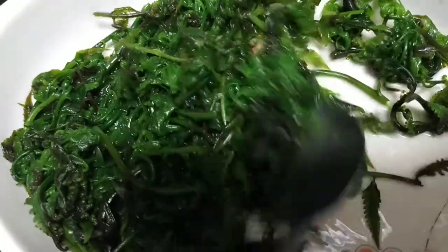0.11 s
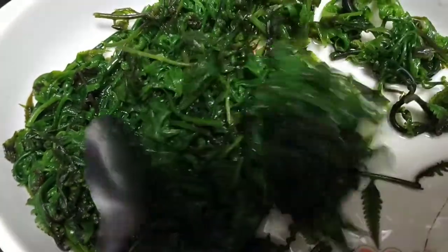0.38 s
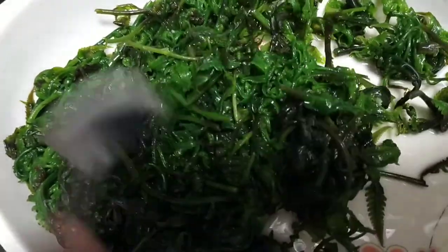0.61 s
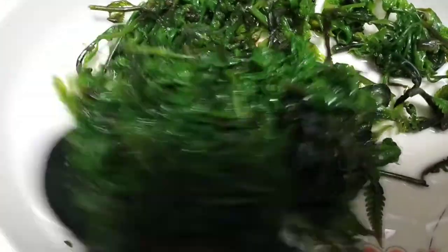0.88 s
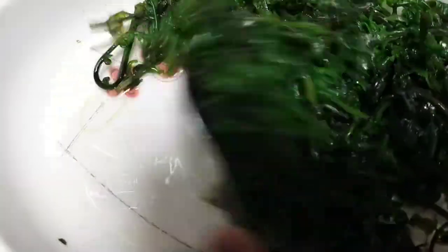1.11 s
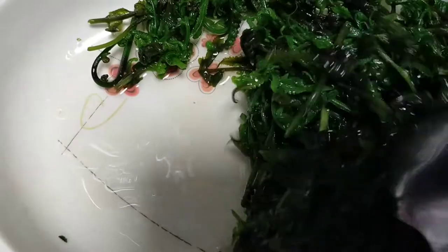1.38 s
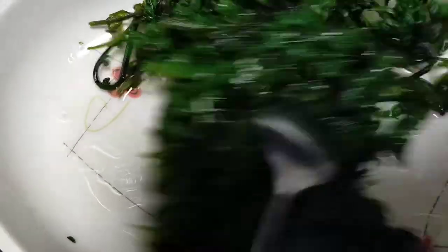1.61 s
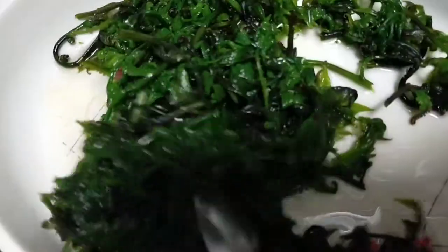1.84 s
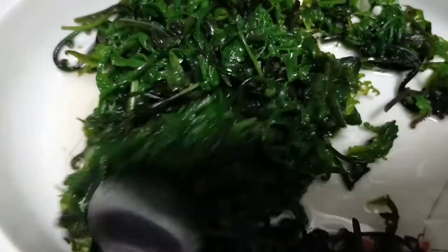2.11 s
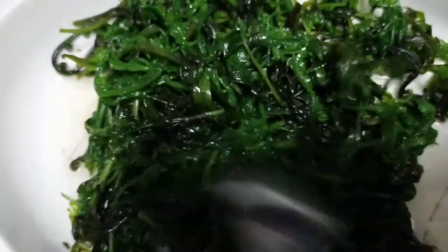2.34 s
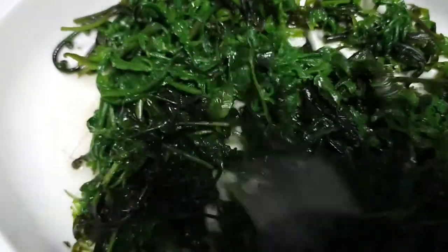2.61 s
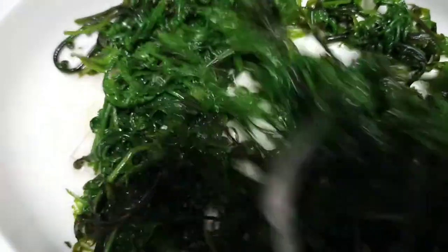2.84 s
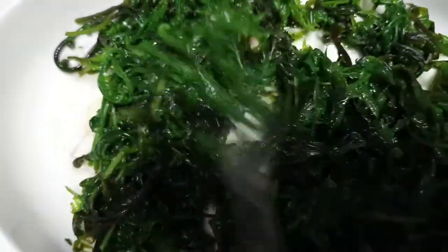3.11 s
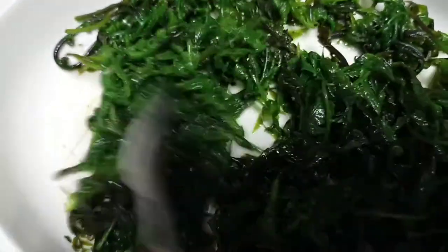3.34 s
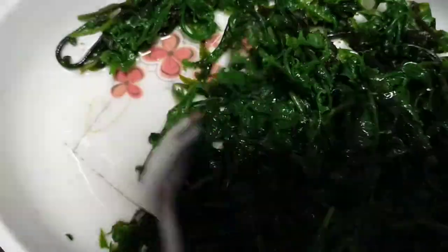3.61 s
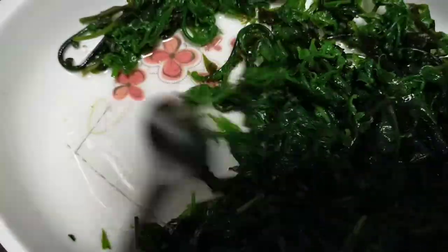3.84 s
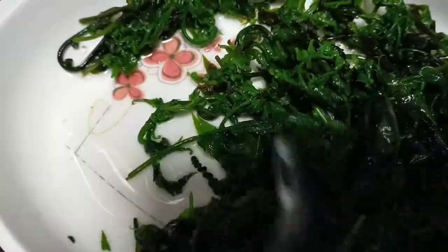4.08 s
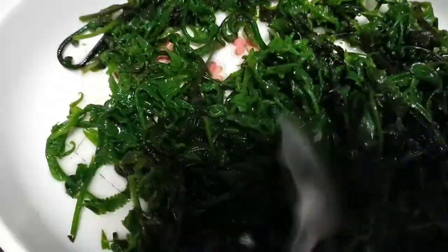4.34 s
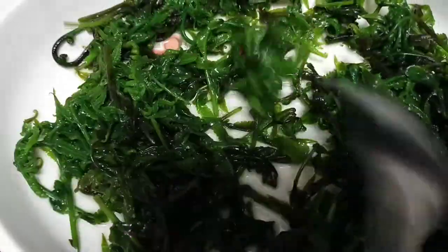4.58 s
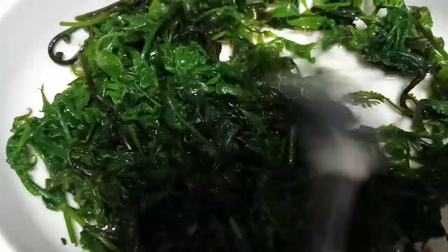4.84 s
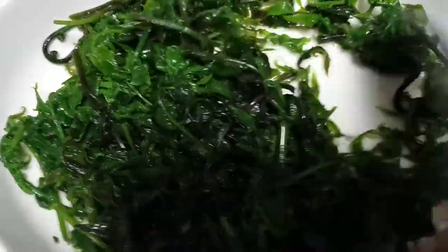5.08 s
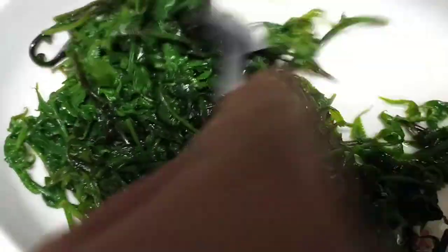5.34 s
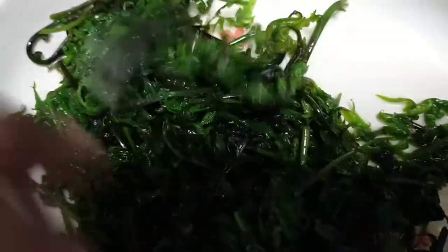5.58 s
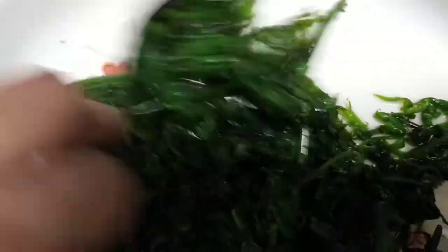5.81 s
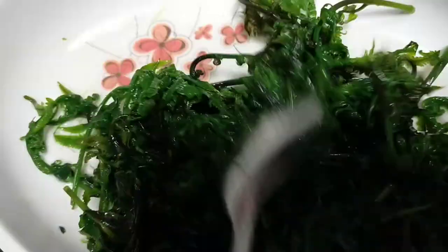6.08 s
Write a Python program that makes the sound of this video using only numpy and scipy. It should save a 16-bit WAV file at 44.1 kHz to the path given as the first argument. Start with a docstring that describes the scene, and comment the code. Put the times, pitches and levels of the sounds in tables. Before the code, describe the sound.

A metal spoon tosses wet leafy greens on a glazed plate, with faint brushes, small clinks, short scrapes and three hard raps near the end.

```python
"""A small hard kitchen: a metal spoon tosses wet greens on a glazed plate, close to a phone microphone.
Taps are bursts of grit that ring modes of plate and spoon; blunt landings add low knocks of the plate.
Scrapes over glaze and brushes through leaves are dense grit in moving bands; parting leaves tick brightly.
Sparse reflections answer from the room, over shaped air noise, low drones and a thin whistle."""
import sys
import numpy as np
from scipy import signal
from scipy.fft import rfft, irfft
from scipy.io import wavfile
from scipy.ndimage import uniform_filter1d

SR = 44100
rng = np.random.default_rng(int(sys.argv[2]) if len(sys.argv) > 2 else 0)


def elevation(decibels):
    """Turn decibel levels (scalar or array-like) into linear amplitude ratios."""
    levels = np.asarray(decibels, float)
    return 10 ** (levels / 20)


def generate_wav(sig):
    """Save sig (samples, or channels by samples) to the path in sys.argv[1] as 16-bit PCM at SR."""
    pcm = np.round(np.clip(np.atleast_2d(sig).T, -1, 1) * 32767).astype(np.int16)
    wavfile.write(sys.argv[1], SR, pcm)


N = 273176  # length in samples

# spoon and stems meeting the plate:
# start_s, usual_peak_db, loudest_ring_hz, chatter_ms, treble_db, hollow_db
TAP_EVENTS = [(0.723, -13, 1530, 10.4, 5, -6), (0.857, -27, 1560, 17, 6, -5),
              (0.96, -35, 2260, 16, 2.5, -12), (1.845, -47, 2130, 6.0, 1, -12),
              (1.87, -36, 1320, 11, -6.5, -22), (1.908, -39, 1720, 9.8, -6, -5),
              (2.223, -26.5, 1880, 1.4, -1, 5.5), (2.51, -41, 2410, 8.8, -16, 4),
              (2.738, -42.5, 1750, 5, 3.5, -7), (2.806, -42.5, 2170, 15, -23, 0),
              (3.101, -31, 1150, 1.8, -0.5, -4), (3.113, -36, 1180, 4.6, -1, 7),
              (3.356, -42, 2260, 3.6, 2, -3.0), (3.421, -41.5, 1410, 3.9, 6, -7),
              (3.562, -40.5, 1810, 6.5, 5.5, 15.5), (3.581, -39, 2290, 5.7, 6, -7),
              (3.601, -35, 1670, 6.2, 1.5, 5), (3.638, -42, 2240, 6.8, 2, -6),
              (3.76, -43.5, 3420, 17, 2, -13), (3.784, -24.5, 1510, 9.4, -4.5, 7),
              (3.786, -32, 3600, 7, -7, -2), (4.128, -39, 1170, 10, -2, 2),
              (4.208, -47, 2300, 6.4, 5.5, -3.0), (4.345, -26, 2050, 4.6, -1, 9),
              (4.411, -31.5, 2980, 20, 8, 3), (4.639, -41.5, 2480, 4.5, 10, 3),
              (4.717, -46, 2100, 9.4, 6, -8), (4.909, -6, 1410, 1, 0, -35), (4.995, -37, 1360, 11, 7.5, -7),
              (5.031, -30, 2320, 7.7, -17, 0), (5.144, -5, 1650, 4.6, -0.5, -3),
              (5.156, -28, 1590, 11, -13, 15), (5.261, -27, 2380, 2.5, -14, 7),
              (5.692, -5, 1510, 3.35, 4.5, -4)]
# modes of plate and spoon, one row per entry of MODE_HZ: relative_level_db, t60_s
MODE_DECAYS = [(-10, 0.039), (1.5, 0.1), (2.5, 0.073), (-9, 0.05), (-13, 0.021), (-2, 0.071), (-2.5, 0.046),
               (0, 0.06), (-5, 0.12), (-5.5, 0.08), (-4, 0.096), (5.5, 0.027), (0.5, 0.075), (-6, 0.059),
               (-12, 0.036), (-1.5, 0.048), (-15, 0.067), (6, 0.033), (-15, 0.11), (-2.5, 0.13),
               (-36, 0.054), (0, 0.062), (-2, 0.099), (-2, 0.073), (-7, 0.05), (5, 0.05), (-7, 0.03)]
# pitches of those modes: pitch_hz
MODE_HZ = [738, 1060, 1110, 1345, 1520, 1745, 1810, 2165, 2400, 2640, 2880, 3420, 3660, 3835, 5260, 6110,
           6440, 7180, 7420, 7660, 8230, 9975, 10800, 11250, 11600, 12330, 15100]
# the plate rocks on the table, a blunt landing is wide: start_s, peak_db, pitch_hz, width_hz
ROCK_EVENTS = [(0.725, -34, 252, 200), (0.959, -44, 402, 250), (1.869, -49, 215, 80), (2.227, -33, 222, 80),
               (2.51, -45.5, 200, 70), (2.806, -42, 204, 70), (3.101, -45, 224, 70), (3.113, -33, 227, 80),
               (3.355, -46, 230, 80), (3.562, -37, 523, 250), (3.783, -33.5, 534, 200),
               (4.128, -43, 200, 100), (4.345, -32, 280, 250), (4.91, -26, 335, 303),
               (5.145, -22, 328, 300), (5.156, -31, 150, 90), (5.259, -40, 313, 120),
               (5.693, -34.5, 357, 170), (5.7, -39.5, 130, 60)]
# the spoon drags over bare glaze, one list a scrape:
# time_s, pressure_db, relative_treble_db, lower_band_hz, upper_band_db
SCRAPE_CURVES = [
    [(0.76, -47, -7, 1380, 15), (0.802, -50, 1, 1470, -7), (0.822, -37, -5, 1450, -12),
     (0.86, -41.5, 11, 1540, 8), (0.896, -34.5, 3, 1600, 2), (0.94, -55.5, 0, 1470, 8),
     (0.966, -36, -22, 1340, -25), (0.984, -58, 3, 1550, -13), (1.02, -49, -17, 1520, -6)],
    [(3.775, -44, -4, 1470, -5), (3.797, -36.5, -10, 1560, -27), (3.835, -34, -1.7, 1250, -29),
     (3.871, -31.5, -6, 1670, 0), (3.895, -60, -12, 1680, 6)],
    [(4.355, -28, -20, 1320, -22), (4.38, -46.5, 0, 1420, -10), (4.408, -35, -4.5, 1390, -1.5),
     (4.436, -36.5, -7, 1780, 6), (4.445, -41.5, -12, 1600, -2), (4.47, -52, -21, 1620, -13)],
    [(4.93, -35, -22, 1600, -11), (4.992, -47.5, -6, 1500, 4), (5.0, -30, -10.5, 1510, -23),
     (5.092, -41, -6, 1490, -14), (5.13, -41, -11, 1680, -3)],
    [(5.178, -29, -16, 1450, 10), (5.21, -44, -6, 1216, -27), (5.268, -29, -14, 1340, -28),
     (5.276, -41.5, -10, 1330, -24), (5.362, -47, -10, 1475, -10), (5.452, -53, -11, 1290, -5),
     (5.468, -53, -2, 1390, -14), (5.52, -60, -19, 1350, 2)],
]
# the spoon brushes through the leaves: start_s, top_s, end_s, top_pressure_db, relative_treble_db
BRUSH_EVENTS = [(0.336, 0.41, 0.445, -56.5, -18), (0.44, 0.463, 0.5, -53.5, -20),
                (1.47, 1.552, 1.63, -49, -6.5), (1.833, 1.859, 1.9, -47, 0),
                (1.865, 1.908, 1.95, -41.5, -7.5), (2.158, 2.227, 2.3, -42, -3.5),
                (2.479, 2.513, 2.64, -49, -3.5), (2.771, 2.812, 2.87, -51.5, 3.5),
                (3.051, 3.113, 3.16, -45.5, -6.5), (3.3, 3.366, 3.4, -46.5, -10),
                (3.361, 3.4, 3.49, -58.5, 2.5), (3.553, 3.575, 3.62, -41.5, -12),
                (3.567, 3.608, 3.68, -45, -7), (3.967, 4.06, 4.12, -55, -4), (4.078, 4.13, 4.17, -45.5, -5),
                (4.608, 4.643, 4.72, -53, -6), (4.657, 4.751, 4.81, -54.5, -0.5),
                (5.705, 5.804, 6.15, -48, -1)]
# wet leaves part with a thin tick: start_s, peak_db
TICK_EVENTS = [(0.379, -50), (1.984, -42), (2.452, -46), (3.019, -45), (3.296, -43), (3.333, -45),
               (3.403, -41), (3.474, -42), (4.034, -44), (5.227, -31), (5.467, -44), (6.082, -44),
               (6.142, -45)]
# decay of the room's reflections: band_hz, t60_s
ROOM_DECAY = [(250, 0.89), (700, 0.37), (1800, 0.5), (4600, 0.5), (11000, 0.39), (15000, 0.3)]
# spectral shape of the background air: band_hz, relative_density_db (per Hz)
AIR_SHAPE = [(20, -7), (35, -42), (47, -36), (90, -10.5), (170, -11.5), (300, -6.5), (450, -13.5),
             (700, -15), (1500, -19.5), (2800, -26.5), (4000, -37), (8000, -34), (12000, -29), (15000, -27)]
# low drones and a thin whistle: pitch_hz, width_hz (of each of two passes), rms_db
DRONE_BANDS = [(50.7, 19, -56), (75.5, 5.4, -65), (125.2, 21, -67), (228, 7.5, -65.5), (270.6, 40, -63),
               (342.7, 13.3, -61.5), (630.3, 9.2, -69), (7460, 630, -66.5)]
# colour of microphone and port: band_hz, gain_db
MIC_COLOUR = [(500, -3.5), (1000, -0.5), (2700, 5.5), (3150, -1), (3700, 2.5), (4200, 0.5), (4900, -6),
              (6300, -5.5), (7500, -3), (9300, -13.5), (10700, -8), (12200, -12.5), (13300, -15),
              (15500, -18.5)]

TWIN_APART = .011  # each mode has a twin this fraction higher, and the two beat
SPOT_SPREAD_DB, LEAF_DAMP_DB_PER_KHZ = 1.3, -0.4  # uneven modes; a sliding contact dulls the high ones
TAP_RING_DB, TAP_RING_DB_PER_DB = -2.5, 0.13  # ringing against the dull crack, and its growth with the tap
SCRAPE_RING_DB = -11
LEAD_MS = 5  # room ahead of each landing
PUSH_DB = -32.5  # every tap pushes the table, this far under its level
BRUSH_ENDS_DB, BRUSH_HZ, BRUSH_UPPER_DB = -20.5, 1490, -7.5
UPPER_HZ, UPPER_HZ_PER_DB = 2334, 27  # the upper band sits higher where it is stronger
# the hollow sounds most when the lower band is low
HOLLOW_DB, HOLLOW_OPEN_HZ, HOLLOW_DB_PER_HZ = 0.5, 1227, -0.0683
TICK_HZ, TICK_WIDTH_HZ, TICK_MS = 10500, 4700, 6.2
KITCHEN_DB, AIR_DB = -8.5, -52  # reflections against the plate; rms of the air
EDGE_HZ = 15780  # upper band limit


def evened(x):
    """Scales to rms 1."""
    return x / np.sqrt(np.mean(x ** 2) + 1e-20)


def read(points, hz):
    """Reads a table on a log-frequency axis."""
    table_hz, value = np.transpose(points)
    return np.interp(np.log(hz + 1), np.log(table_hz + 1), value)


def add(mix, start_s, sound):
    """Mixes a sound in at its start time."""
    part = mix[round(start_s * SR):][:len(sound)]
    part += sound[:len(part)]


def band(x, lo_hz, hi_hz):
    """Causal band-pass."""
    return signal.sosfilt(signal.butter(2, [lo_hz, hi_hz], "band", fs=SR, output="sos"), x)


def resonate(x, hz, width_hz):
    """Shifts the curve hz down to zero, smooths, and shifts back: a resonance of gain 1."""
    turn = np.exp(2j * np.pi * np.cumsum(hz * np.ones(len(x))) / SR)
    pole = np.exp(-np.pi * width_hz / SR)
    smooth = signal.lfilter([1 - pole], [1, -pole], x / turn + 1e-18)
    return 2 * (turn * smooth).real


def resonate_twice(x, hz, width_hz):
    """Two equal resonances in a row, for steeper skirts."""
    return resonate(resonate(x, hz, width_hz), hz, width_hz)


def flatten_spectrum(x):
    """Evens out broad chance humps in a spectrum, so that a cluster of contacts is as flat as one."""
    spectrum = rfft(x)
    local_power = uniform_filter1d(abs(spectrum) ** 2, 24)
    return irfft(spectrum / np.sqrt(local_power + 1e-12), len(x))


def grit(count, per_s, spread_db):
    """Sparse contacts of random sign and uneven size."""
    hit, size, sign = rng.random((count, 3)).T
    strength = elevation(-spread_db * np.log(size + .03))
    return (hit < per_s / SR) * strength * np.sign(sign - .5)


def ringing(spot_db):
    """Impulse response of plate and spoon: decaying mode pairs, weighted by the spot struck."""
    t = np.arange(8000)[:, None] / SR
    mode_db, t60 = np.transpose(MODE_DECAYS)
    spot = SPOT_SPREAD_DB * rng.standard_normal(len(mode_db))
    phase, twin_phase = rng.random((2, len(mode_db)))
    mode = np.sin(2 * np.pi * (t * MODE_HZ + phase))
    twin = np.sin(2 * np.pi * (t * MODE_HZ * (1 + TWIN_APART) + twin_phase))
    decay = elevation(mode_db + spot_db + spot - 60 * t / t60)
    ring = (decay * (mode + 0.71 * twin)).sum(1)
    return ring / np.linalg.norm(ring)


def tap(start_s, peak_db, ring_hz, chatter_ms, treble_db, hollow_db):
    """Quick bounces crack, ring the modes near ring_hz most, sound the hollow and push the table."""
    t_ms = np.arange(8000) / SR * 1000 - LEAD_MS
    after = np.maximum(t_ms, 0)
    chatter = (1 - np.exp(-after / 0.84)) * np.exp(-after / max(chatter_ms, .3))
    bounces = flatten_spectrum(grit(len(t_ms), 5000., 2.86) * chatter)
    # a faint swell leads into each landing
    bounces *= np.exp(np.minimum(t_ms, 0) / 1.9) * np.exp(-after / 37.0)

    # the hardest bounce rings the plate
    hardest = np.arange(len(t_ms)) == abs(bounces).argmax()
    blow = np.linalg.norm(bounces) * hardest
    spot_db = 3 * np.exp(-(np.log(np.divide(MODE_HZ, ring_hz)) / .15) ** 2)
    ring = signal.fftconvolve(blow, ringing(spot_db))[:len(t_ms)]
    # bare metal on glaze is loud and rings; leaves damp the soft taps
    body = bounces + elevation(TAP_RING_DB + TAP_RING_DB_PER_DB * peak_db) * ring

    low = band(band(body, 890.0, 5420.0), 790.0, 7230.0)
    low += 2.62 * resonate(bounces, ring_hz, 285.0)
    # usual peak of a burst this long
    crest = 2.22 * np.linalg.norm(low) / np.sqrt((chatter_ms + 3.1) * SR / 2000)
    treble = band(body, 3860.0, 19700.0)
    hollow = band(band(body, 750.0, 1320.0), 750.0, 1320.0)
    push = band(bounces, 260.0, 740.0)
    sound = (low + elevation(treble_db) * treble + elevation(hollow_db) * hollow) / crest
    sound += elevation(PUSH_DB) * push / abs(push).max()
    return start_s - LEAD_MS / 1000, elevation(peak_db) * sound


def rock(start_s, peak_db, hz, width_hz):
    """The plate tips and lands with one low, soft-edged knock."""
    knock = resonate_twice(np.arange(6000) == 0, hz, width_hz) * rng.choice([-1, 1])
    return start_s, elevation(peak_db) * knock / abs(knock).max()


def stroke(rows):
    """Dense grit under the sliding spoon drives the plate; two bands move with the contact point."""
    s, *columns = np.transpose(rows)
    t = np.arange(s[0], s[-1], 1 / SR)
    pressure_db, treble_db, lower_hz, upper_db = (np.interp(t, s, c) for c in columns)
    upper_hz = UPPER_HZ + UPPER_HZ_PER_DB * upper_db
    hollow_db = HOLLOW_DB + HOLLOW_DB_PER_HZ * (lower_hz - HOLLOW_OPEN_HZ)

    # the edge sticks and slips
    slips = elevation(1.8 * evened(uniform_filter1d(rng.standard_normal(len(t)), 200)))
    snaps = 5.2 * grit(len(t), 60., 2.1)  # stems snap and wet leaves part
    rub = evened(grit(len(t), 5000., 1.9)) + snaps
    rub = rub * slips * signal.windows.tukey(len(t), .1)
    damp_db = LEAF_DAMP_DB_PER_KHZ * np.divide(MODE_HZ, 1000)
    body = rub + elevation(SCRAPE_RING_DB) * signal.fftconvolve(rub, ringing(damp_db))[:len(t)]

    lower = evened(resonate_twice(body, lower_hz, 640.0))
    upper = evened(resonate_twice(body, upper_hz, 750.0))
    low = 0.45 * (lower + elevation(upper_db) * upper)
    low += 0.29 * evened(band(body, 1450.0, 2500.0))
    high = evened(band(body, 6200.0, 19845.0))
    hollow = evened(band(band(body, 760.0, 1145.0), 760.0, 1145.0))  # air under the rim
    sound = low + elevation(treble_db + 4.0) * high + elevation(hollow_db) * hollow
    return s[0], elevation(pressure_db) * sound


def brush(start_s, top_s, end_s, top_db, treble_db):
    """A light stroke of steady colour that swells and fades in straight dB lines."""
    swell = ((start_s, BRUSH_ENDS_DB), (top_s, 0), (end_s, BRUSH_ENDS_DB))
    return stroke([(s, top_db + db, treble_db, BRUSH_HZ, BRUSH_UPPER_DB) for s, db in swell])


def tick(start_s, peak_db):
    """Wet leaves part in a few milliseconds of bright crackle."""
    t_ms = np.arange(1200) / SR * 1000
    crackle = resonate(grit(len(t_ms), 7000., 2.5), TICK_HZ, TICK_WIDTH_HZ) * np.exp(-t_ms / TICK_MS)
    return start_s, elevation(peak_db) * crackle / abs(crackle).max()


def kitchen(x):
    """Sparse reflections of random sign, each band dying at its own speed."""
    reflections = np.zeros(SR)
    at = np.arange(120, SR - 20, 10)
    at = at + rng.integers(0, 10, len(at))
    reflections[at] = rng.choice([-1., 1.], len(at))
    hz, t, z = signal.stft(reflections, SR, nperseg=128)
    decay = elevation(-60 * t / read(ROOM_DECAY, hz)[:, None])
    tail = signal.istft(z * decay, SR, nperseg=128)[1]
    return signal.fftconvolve(x, tail / np.linalg.norm(tail))[:N]


def background():
    """Smooth air noise with faint patches, and wavering drones from resonances fed by noise."""
    frames, hz = N // 512 + 5, np.fft.rfftfreq(2048, 1 / SR)
    real, imaginary, patches = rng.standard_normal((frames, 1025, 3)).T
    patches_db = evened(uniform_filter1d(uniform_filter1d(patches, 24, 0), 10, 1))
    z = (real + 1j * imaginary) * elevation(read(AIR_SHAPE, hz)[:, None] + patches_db)
    air = elevation(AIR_DB) * evened(signal.istft(z, nperseg=2048, noverlap=1536)[1][:N])
    drones = (elevation(rms_db) * evened(resonate_twice(rng.standard_normal(N), pitch_hz, width_hz))
              for pitch_hz, width_hz, rms_db in DRONE_BANDS)
    return air + sum(drones)


def scene():
    """Plate sounds, their reflections and the background, at one point."""
    plate = np.zeros(N)
    for source, table in ((tap, TAP_EVENTS), (rock, ROCK_EVENTS), (tick, TICK_EVENTS), (brush, BRUSH_EVENTS)):
        for row in table:
            add(plate, *source(*row))
    for rows in SCRAPE_CURVES:
        add(plate, *stroke(rows))
    mono = plate + elevation(KITCHEN_DB) * kitchen(plate) + background()
    return np.array([mono, mono])


def low_pass(x):
    """Removes everything above the highest recorded frequency."""
    return signal.sosfilt(signal.butter(12, 16830, fs=SR, output="sos"), x)


def record(dry):
    """Causal colour of the microphone port, soft overload, then the band limit."""
    hz = abs(np.fft.fftfreq(4096, 1 / SR))
    log_gain = np.log(elevation(read(MIC_COLOUR, hz)))
    # minimum phase: the port answers only after the sound
    port = np.fft.ifft(np.exp(log_gain - 1j * signal.hilbert(log_gain).imag)).real[:2048]
    heard = signal.oaconvolve(dry, port[None])[:, :N]
    heard = .55 * np.tanh(heard / .55)  # the input stage rounds off the loudest peaks
    edge = signal.firwin(511, EDGE_HZ, window=("kaiser", 9), fs=SR)
    mix = signal.oaconvolve(heard, edge[None], "same")
    return low_pass(mix)


dry = scene()
out = record(dry)
generate_wav(out)
```